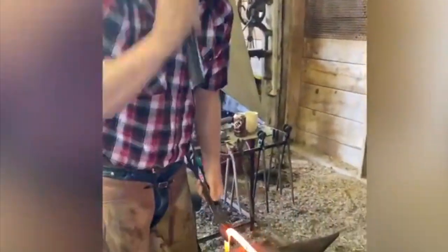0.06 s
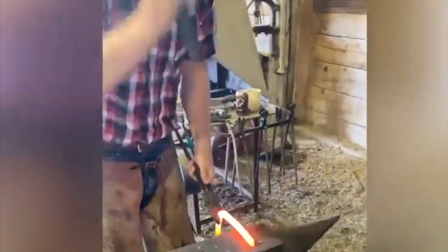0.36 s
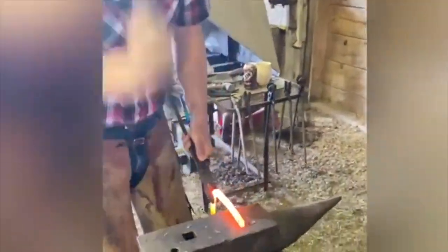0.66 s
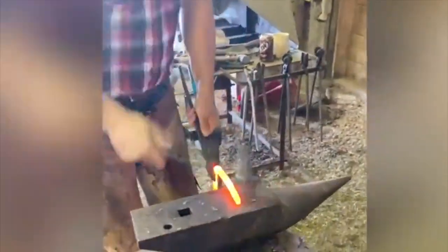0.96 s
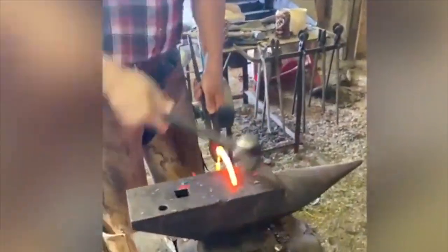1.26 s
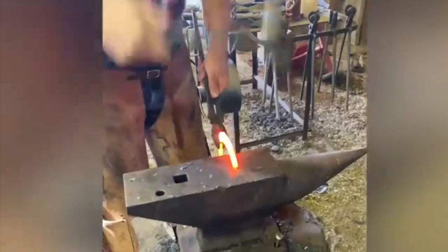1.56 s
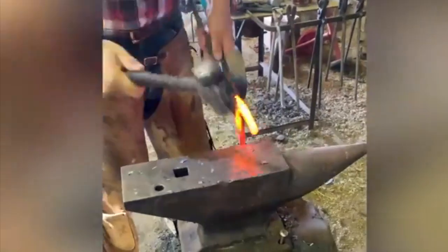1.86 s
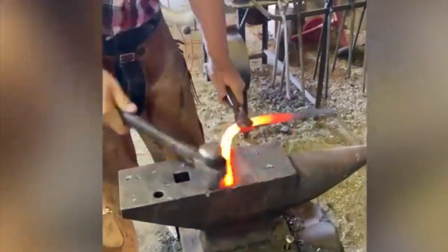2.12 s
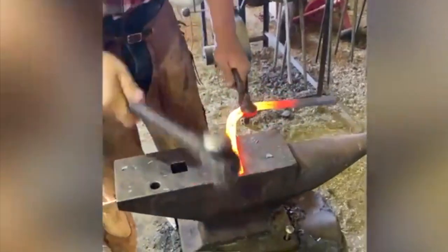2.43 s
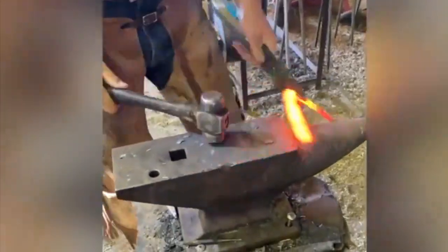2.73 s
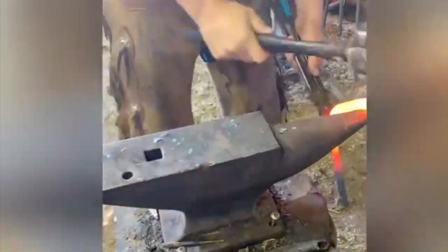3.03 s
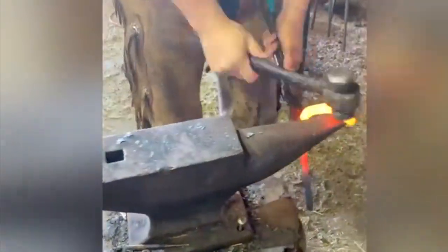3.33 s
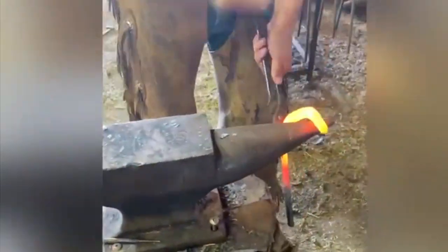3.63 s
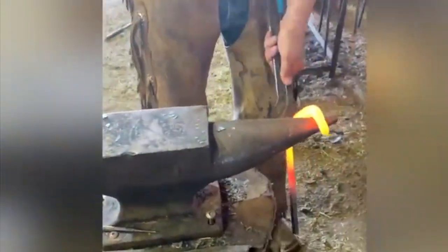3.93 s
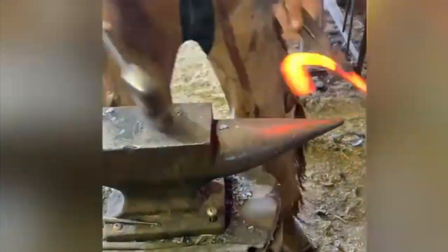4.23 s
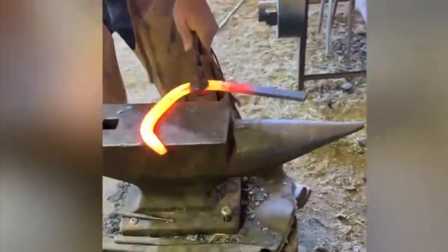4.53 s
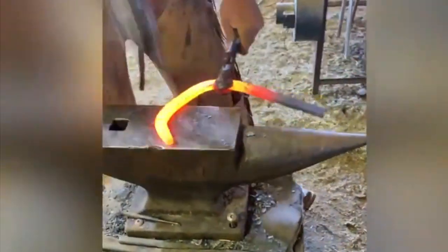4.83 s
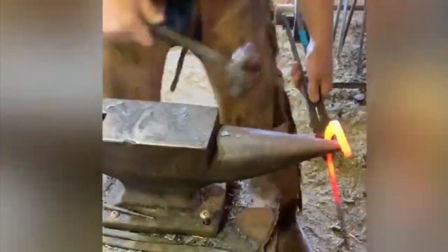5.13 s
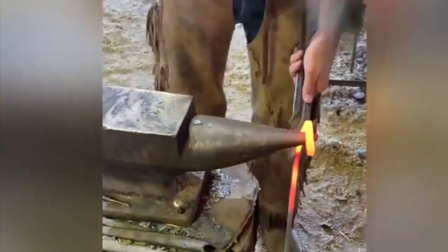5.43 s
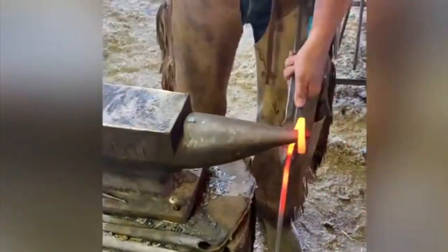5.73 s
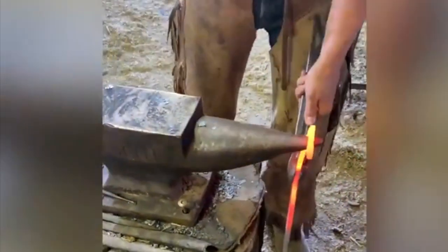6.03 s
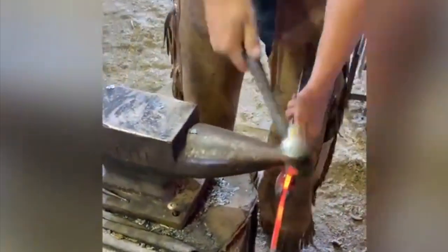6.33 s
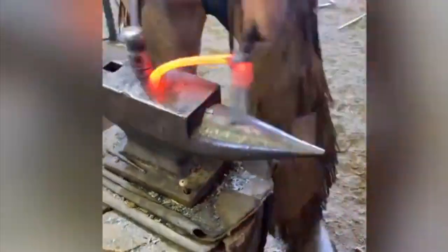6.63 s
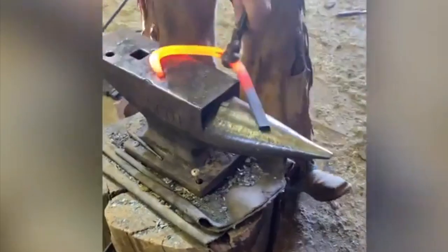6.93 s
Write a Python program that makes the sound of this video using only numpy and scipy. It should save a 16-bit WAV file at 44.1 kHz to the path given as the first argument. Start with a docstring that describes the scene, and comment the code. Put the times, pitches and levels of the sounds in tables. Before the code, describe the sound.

A hammer strikes a hot steel bar on an anvil in a quick, even run of hard clacks, then drops and bounces with a bright clink. Ringing taps on the bare anvil and more bounces separate further blows, some of them duller clanks that rock the stand. A gas forge roars and hisses behind throughout. The stereo microphone is close, in a small wooden workshop.

```python
"""A farrier's hammer bends a hot steel bar on an anvil, close in front of a camera's stereo microphone.
Blows on the face clack on the bar; blows over the horn rock the stand. Between them, light taps ring
the bare anvil and the hammer bounces to rest. Farther back a gas forge roars and hisses, and the
boards of the small wooden workshop answer each strike. The camera's limiter ducks the roar after
each hard blow."""
import sys
import numpy as np
from scipy import signal
from scipy.fft import rfft, irfft, next_fast_len
from scipy.io import wavfile
from scipy.ndimage import uniform_filter1d, minimum_filter1d, map_coordinates

SR = 44100
rng = np.random.default_rng(int(sys.argv[2]) if len(sys.argv) > 2 else 0)


def unload_audio(sound):
    """Save the sound as a 16-bit wav file, at the path given as the first command line argument."""
    columns = np.transpose(np.atleast_2d(sound))
    # keep every value between -1 and 1, then stretch to whole-number steps
    steps = np.round(np.clip(columns, -1, 1) * 32767)
    wavfile.write(sys.argv[1], SR, steps.astype(np.int16))


N = 307377
T = np.arange(int(.42 * SR)) / SR  # seconds into one strike

# The wooden room. Each row: frequency in Hz, t60 in seconds.
ROOM_DECAY = [(200, 0.033), (1500, 0.29), (4500, 0.24), (8500, 0.2), (13000, 0.16)]
# The forge at the microphone. Each row: frequency in Hz, left-right likeness from 0 to 1.
STEREO_LIKENESS = [(60, .98), (300, .996), (700, .985), (1100, .92), (2500, .65), (6000, .3)]
# The two microphone ports hear the anvil out of step. Each row: frequency in Hz, left lead in radians.
PORT_LEAD = [(1000, 0), (4300, -.1), (5900, 1.6), (8800, 2.3), (10000, .4), (11500, 1), (13000, 2.6)]

# The forge, louder at first. Each row: time in seconds, then roar, flame and gas hiss in dB.
FORGE_LEVELS = [(0, -19, -39.5, -44.5), (.8, -18.5, -41, -44), (1.2, -21, -43, -45.5),
                (1.7, -24.5, -46.5, -50.5), (2.4, -25.5, -48.5, -52), (3.6, -25, -47.5, -51.5),
                (4.7, -27.5, -45.5, -52.5), (5.6, -24, -40.5, -51), (5.9, -24.5, -45.5, -51.5),
                (6.45, -25, -39, -51), (6.97, -26, -38.5, -51.5)]
# Firebox resonances. Each row: frequency in Hz, width in Hz, boost in dB.
FIREBOX_MODES = [(142, 30, 4), (335, 50, 2), (545, 50, 3), (598, 35, 3), (690, 45, 3), (905, 40, 2.5),
                 (970, 35, 2)]
# Noise of the forge, then of a contact. Each row: frequency in Hz, relative density in dB.
ROAR_SPECTRUM = [(30, -47), (50, -45), (80, -26.5), (125, -13.5), (220, -14.5), (300, -6), (460, -4),
                 (700, -1), (800, -5.5), (1000, -6), (1150, -19.5), (1400, -47.5), (2200, -70),
                 (4000, -120)]
FLAME_SPECTRUM = [(400, -49), (800, 7), (1100, 4), (1240, 6.5), (1380, 0.5), (1500, 2.5), (1700, -19.5),
                  (2200, -45), (4000, -120)]
HISS_SPECTRUM = [(1000, -28), (1600, 5.5), (2000, 3.5), (2700, 3), (3600, -8), (4600, -7), (5600, -5),
                 (7000, -11.5), (8800, -11.5), (10000, -17), (12400, -14.5), (14500, -64)]
CRACK_SPECTRUM = [(1200, -15.5), (3000, -5.5), (4200, 4.5), (5500, 8), (7000, 4), (9000, 1.5), (11500, 0),
                  (13500, 0), (14500, -30), (16500, -21)]
CLACK_SPECTRUM = [(25, -10.5), (60, -11.5), (130, -7.5), (300, -4), (700, 10.5), (1250, 3), (1650, -3.5),
                  (2300, 2.5), (3000, -1.5), (4500, -7), (8000, -35.5)]

# The anvil rocking on its stand, and its horn clanking.
# Each row: frequency in Hz, relative level in dB, t60 in seconds.
STAND_MODES = [(395.5, 3, 0.045), (334, -11, 0.1), (478, -5, 0.042), (912, -3.5, 0.024), (1256, -1, 0.018),
               (3850, -15.5, 0.026)]
# Ringing steel. Each row: frequency in Hz, relative level in dB, base t60 in seconds,
# left over right in dB, left lead in radians.
ANVIL_LOW_MODES = [(4494, 0, .045, -4, -.7), (4440, -11, .03, -3, -.4), (5507, -21, .07, -3, .5),
                   (8557, -9, .06, 0, 2.3), (8333, -13, .035, 0, 2.5), (2676, -33, .05, 2, -.3)]
ANVIL_HIGH_MODES = [(5015, 0, .11, -2, -.2), (3870, -14, .03, 0, -.1), (9738, -23, .07, -3, .4),
                    (10760, -21, .04, -1, .5)]
HAMMER_MODES = [(12829, 0, .1, 1, 2.4), (13424, -11, .04, 0, 2.8), (13185, -11, .03, 0, 2.8),
                (10309, -11, .04, -2, .5), (9738, -14, .07, -3, .4)]
CLINK_MODES = [(9738, 0, .075, -3, .4)]

# The hammer let fall on the face. Each row: start in seconds, force in dB, first flight in seconds,
# then low and high anvil ring in relative dB.
HAMMER_DROPS = [(1.9379, 6, .0521, -35.5, -21), (2.6714, -13.5, 0.022, -14, -17),
                (4.188, -1.5, .0524, -8, -37), (6.475, -1.5, 0.052, -22, -23)]
# Taps on the bare anvil, and two late landings of the bouncing hammer (4.32 s, 6.60 s). # Each row: start in
# seconds, force in dB, then low anvil ring, high anvil ring and hammer ring # in relative dB, then freedom to
# ring from 0 to 1.
ANVIL_TAPS = [(2.9135, 6, -3.5, -24, -26, 0.15), (3.0327, 9, -3, -12, -26, 0.2),
              (4.323, -10.5, -23, -36, -24, 0.2), (4.9706, -19.5, -9.5, -21, -34, 0.05),
              (5.2169, 7.5, -5, -16, -18, 0.2), (5.2963, 6, -3.5, -18, -34, 0.09),
              (6.5998, -7, -26, -29, -20, .2), (6.6727, -16, -15, -23, -15, 0.25)]
# Blows on the bar over the horn. Each row: start in seconds, force in dB, then stand thud, bar clack,
# low anvil ring, high anvil ring and hammer ring in relative dB.
BLOWS_ON_HORN = [(3.2804, -5, -1, -33, -6, -39, -18), (3.52, -2.5, -5.5, -24, -6, -43, -19),
                 (3.757, 1, -4, -27, -5, -44, -26), (3.9935, -2.5, -3.5, -15.5, -9.5, -28, -24),
                 (5.5809, -3, -3, -20.5, -9, -14, -22), (5.8268, 0, -3.5, -16.5, -9, -11, -16),
                 (6.0649, -3, -2.5, -17, -13, -23, -16), (6.2904, -1.5, -4, -20, -10, -25, -19)]
# Blows on the bar on the face. Each row: start in seconds, force in dB, then knock of bar and stand,
# high anvil ring and hammer ring in relative dB.
BLOWS_ON_FACE = [(0.1141, 1, 5, -26, -21), (0.387, 9.5, 2.5, -27, -31), (0.6586, 12, 0.5, -23, -29),
                 (0.9213, 13.5, -0.5, -20, -34), (1.1808, 10.5, 1, -14.5, -44),
                 (1.4437, 10.5, -0.5, -25, -37), (1.7168, 9, -3.5, -17.5, -42), (2.337, 2, 5.5, -14.5, -34),
                 (2.5546, 7, 0, -13, -46), (4.5877, 3.5, 0.5, -27, -28), (4.8072, 6, -4.5, -26, -28),
                 (6.929, -2.5, -1.5, -27, -15)]


def amp(db):
    """Decibels to gain."""
    return 10 ** (np.asarray(db) / 20)


def along(points, hz):
    """(Hz, value) points read on a log axis."""
    knots_hz, values = np.transpose(points)
    return np.interp(np.log(hz + 1), np.log(knots_hz + 1), values)


def wobble(rate):
    """A smooth random curve, rate knots a second."""
    knots = rng.standard_normal(int(N * rate / SR) + 4)
    return map_coordinates(knots, [np.arange(N) * rate / SR])


def add(out, start, sound):
    """Mix a strike in at its start in seconds."""
    part = out[:, round(start * SR):][:, :len(T)]
    part += sound[:, :part.shape[1]]


def filtered(x, response):
    """x through a complex frequency response."""
    n = x.shape[-1]
    size = 2 * next_fast_len(n // 2 + 4096)
    return irfft(rfft(x, size) * response(np.fft.rfftfreq(size, 1 / SR)), size)[..., :n]


def causal(gain):
    """The minimum-phase response with this gain."""
    cepstrum = irfft(np.log(gain))
    half = len(cepstrum) // 2
    cepstrum[1:half] *= 2
    cepstrum[half + 1:] = 0
    return np.exp(rfft(cepstrum))


def workshop(x, onset_s):
    """The wall boards answer with a short diffuse tail."""
    hz, t, noise = signal.stft(rng.standard_normal((2, len(T))), SR, nperseg=256)
    decay = amp(-60 * t / along(ROOM_DECAY, hz)[:, None])
    tail = signal.istft(noise * decay, SR, nperseg=256)[1][:, :len(T)]
    tail *= 1 - np.exp(-(T / onset_s) ** 2)
    return signal.fftconvolve(x, tail / np.linalg.norm(tail[0]), axes=1)[:, :len(T)]


def rush(spectrum, resonances=()):
    """Rushing gas at rms 1, raised at its resonances; its bass reaches the microphone nearly mono."""
    def response(hz):
        boost_db = sum(db / (1 + (2 * (hz - centre) / width) ** 2) for centre, width, db in resonances)
        spread = np.arccos(np.clip(along(STEREO_LIKENESS, hz), -1, 1)) / 2
        return amp(along(spectrum, hz) + boost_db) * [np.cos(spread), np.sin(spread)]

    mid, side = filtered(rng.standard_normal((2, N)), response)
    pair = np.array([mid + side, mid - side])
    return pair / np.sqrt(np.mean(pair ** 2))


def forge():
    """Behind the anvil, the burner roars in the firebox, flame rushes out and the gas jet hisses."""
    times, *levels = np.transpose(FORGE_LEVELS)
    roar_db, flame_db, hiss_db = [np.interp(np.arange(N) / SR, times, db) for db in levels]
    flutter_db = .6 * wobble(rate=14)
    roar = amp(roar_db + flutter_db) * rush(ROAR_SPECTRUM, FIREBOX_MODES)
    flame = amp(flame_db + flutter_db) * rush(FLAME_SPECTRUM)
    hiss = amp(hiss_db) * rush(HISS_SPECTRUM)
    return (roar + flame + hiss) * amp([[-.11], [.11]])  # a hair to the right


def burst(spectrum, contact_s, t60, rise_s, width):
    """Noise that holds while steel presses on steel, then dies; rms 1 over its first 4 ms."""
    t = T[:2048]
    noise = rng.standard_normal(len(t)) + width * rng.standard_normal((2, len(t)))
    envelope = amp(-60 * np.maximum(t - contact_s, 0) / t60) * (1 - np.exp(-t / rise_s))
    ports = lambda hz: np.exp(.5j * np.outer([1, -1], along(PORT_LEAD, hz)))
    pair = filtered(noise * envelope, lambda hz: causal(amp(along(spectrum, hz))) * ports(hz))
    pair /= np.sqrt(np.mean(pair[:, t < .004] ** 2))
    return np.pad(pair, ((0, 0), (0, len(T) - len(t))))


def thud(delay_s, rise_s):
    """Horn and stand take the push a moment after the contact."""
    t = np.maximum(T - delay_s, 0)
    seating = 1 + .025 * rng.standard_normal(len(STAND_MODES))
    swing = sum(amp(db - 60 * t / t60) * np.sin(2 * np.pi * hz * detune * t)
                for detune, (hz, db, t60) in zip(seating, STAND_MODES))
    return swing * (1 - np.exp(-t / rise_s))


def ring(modes, freedom, overtone_db, t60_scale, linger_db, linger_t60, choke_db=0, beat_hz=27):
    """Steel modes, choked by the contact; where the steel lies free, a faint beating note lingers."""
    out, side = np.zeros((2, len(T))), np.array([[.5], [-.5]])
    beat = 1 + .5 * np.cos(2 * np.pi * (beat_hz * T + rng.random()))  # a split pair of modes
    linger = freedom * amp(linger_db - 60 * T / linger_t60) * beat
    bright_db = overtone_db - choke_db * (1 - freedom)  # soft hot steel swallows the overtones
    for k, (hz, db, t60, pan_db, lead) in enumerate(modes):
        spot_db = (bright_db + 2 * rng.standard_normal()) * (k > 0)  # overtones vary with the spot hit
        phase = 2 * np.pi * (hz * T + rng.random()) + side * lead
        envelope = amp(-60 * T / (t60_scale * t60)) + linger
        out += amp(db + spot_db + side * pan_db) * envelope * np.sin(phase)
    return out * (1 - np.exp(-T / .00075))


def strike(crack_db, clack_db, thud_db, low_db, high_db, hammer_db, freedom, contact_s):
    """One contact cracks and clacks, rings anvil and hammer and shakes the stand; the room answers."""
    crack = amp(crack_db) * burst(CRACK_SPECTRUM, contact_s, t60=7.1 * contact_s,
                                  rise_s=.31 * contact_s, width=.97)
    clack = amp(clack_db) * burst(CLACK_SPECTRUM, contact_s=.0025, t60=.012, rise_s=.00061, width=.25)
    steel = amp(low_db) * ring(ANVIL_LOW_MODES, freedom, overtone_db=6, t60_scale=.69,
                               linger_db=-10, linger_t60=.27, choke_db=2)
    steel += amp(high_db) * ring(ANVIL_HIGH_MODES, freedom, overtone_db=4, t60_scale=.96,
                                 linger_db=-16, linger_t60=.22)
    steel += amp(hammer_db) * ring(HAMMER_MODES, freedom, overtone_db=1.5, t60_scale=.98,
                                   linger_db=-16, linger_t60=.27)
    push = amp(thud_db) * thud(delay_s=.002994, rise_s=.0023)
    room = workshop(amp(-11) * (crack + clack) + amp(-17.5) * steel + amp(-24) * push, onset_s=.002)
    return crack + clack + steel + push + room


def clink():
    """The hammer's first drop gives a bright, short clink of steel."""
    note = amp(-4.5) * ring(CLINK_MODES, freedom=1, overtone_db=0, t60_scale=.86,
                            linger_db=-40, linger_t60=.25)
    out = np.zeros((2, N))
    add(out, HAMMER_DROPS[0][0], note + amp(-22) * workshop(note, onset_s=.004))
    return out


def bouncing(landings=4, flight_ratio=.73, bounce_loss_db=5, ring_loss_db=1):
    """The loosely held hammer bounces ever faster and softer, its own head ringing."""
    out = np.zeros((2, N))
    for start, force_db, flight_s, low_db, high_db in HAMMER_DROPS:
        for k in range(landings):
            landing = start + flight_s * np.sum(flight_ratio ** np.arange(k))
            click = strike(crack_db=-11.5, clack_db=-18.5, thud_db=-17,
                           low_db=low_db - ring_loss_db * k, high_db=high_db - ring_loss_db * k,
                           hammer_db=-15, freedom=.29, contact_s=.0026 if k == 0 else .0012)
            add(out, landing, amp(force_db - bounce_loss_db * k) * click)
    return out


def hammering():
    """Close up: face blows clack on the bar, horn blows rock the stand, taps let the bare anvil sing."""
    out = np.zeros((2, N))
    for start, force_db, knock_db, high_db, hammer_db in BLOWS_ON_FACE:
        blow = strike(crack_db=-15.5, clack_db=knock_db - 16, thud_db=knock_db - 14, low_db=-15.5,
                      high_db=high_db, hammer_db=hammer_db, freedom=.25, contact_s=.002)
        add(out, start, amp(force_db) * blow)
    for start, force_db, thud_db, clack_db, low_db, high_db, hammer_db in BLOWS_ON_HORN:
        blow = strike(crack_db=-16.5, clack_db=clack_db, thud_db=thud_db, low_db=low_db,
                      high_db=high_db, hammer_db=hammer_db, freedom=0, contact_s=.0025)
        add(out, start, amp(force_db) * blow)
    for start, force_db, low_db, high_db, hammer_db, freedom in ANVIL_TAPS:
        tap = strike(crack_db=-18, clack_db=-28, thud_db=-17.5, low_db=low_db,
                     high_db=high_db, hammer_db=hammer_db, freedom=freedom, contact_s=.0024)
        add(out, start, amp(force_db) * tap)
    return out


def scene():
    """From the microphone: anvil in front, forge behind."""
    return hammering() + bouncing() + clink() + forge()


def limiter(x, ceiling_db=-10.5, sense_s=.0038, hold_s=.061, release_db_per_s=191):
    """The gain drops at once by what exceeds the ceiling, holds, then climbs back at a steady rate."""
    sense, hold = int(sense_s * SR), int(hold_s * SR)
    power = uniform_filter1d(np.mean(x ** 2, axis=0), sense)
    level_db = 10 * np.log10(np.abs(power) + 1e-12)
    held_db = minimum_filter1d(np.minimum(ceiling_db - level_db, 0), hold, origin=(hold - 1) // 2)
    climb_db = release_db_per_s * np.arange(N) / SR
    gain_db = np.minimum.accumulate(held_db - climb_db) + climb_db
    return x * amp(uniform_filter1d(gain_db, sense // 2))


def record(dry):
    """The camera limits the blows, rounds off the highest peaks and keeps nothing above 16.8 kHz."""
    limited = limiter(dry)
    rounded = limited / (1 + np.abs(limited) ** 6) ** (1 / 6)
    return filtered(rounded, lambda hz: np.clip((16800 - hz) / 500, 0, 1))


dry = scene()
out = record(dry)
unload_audio(out)
```